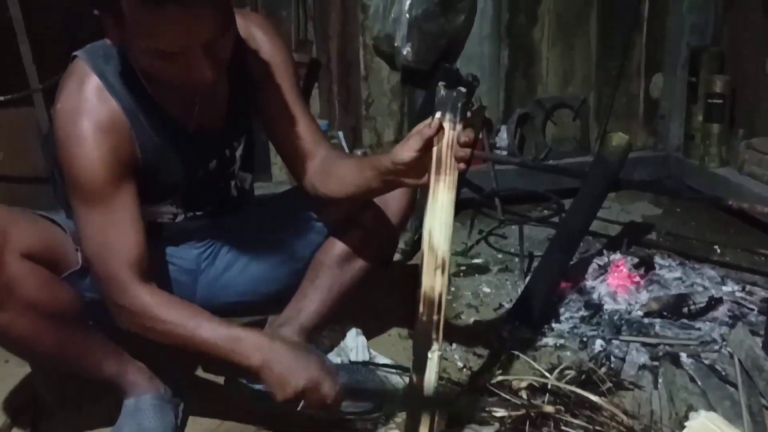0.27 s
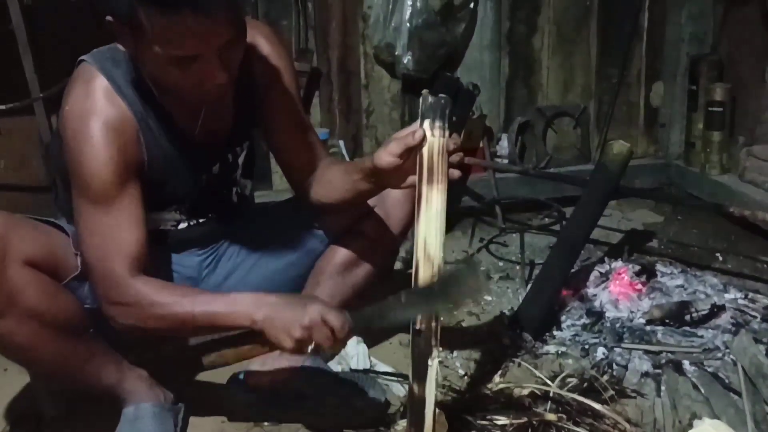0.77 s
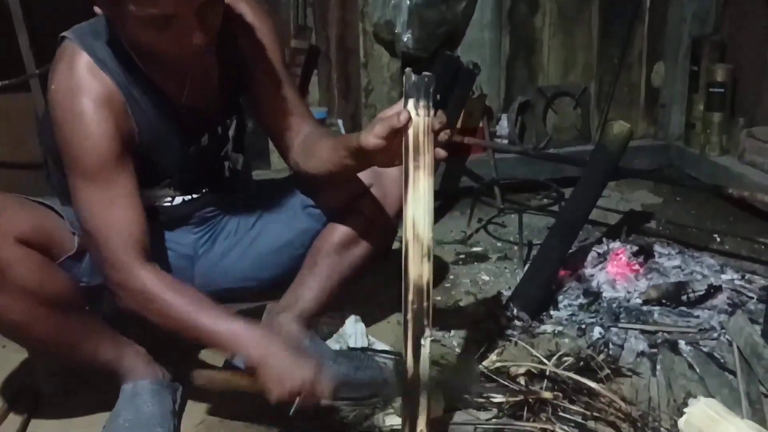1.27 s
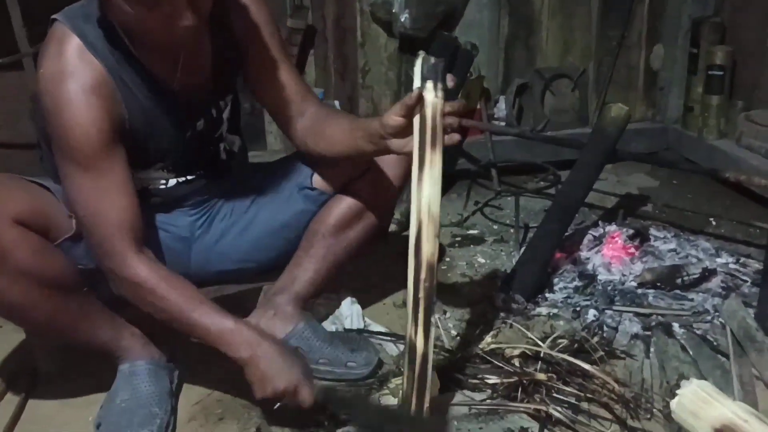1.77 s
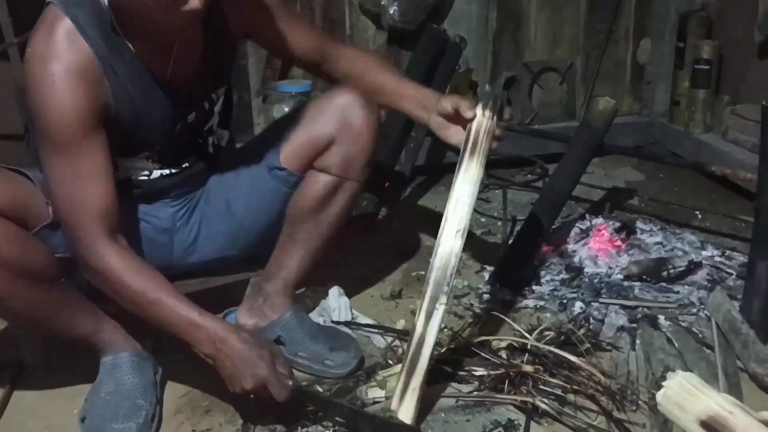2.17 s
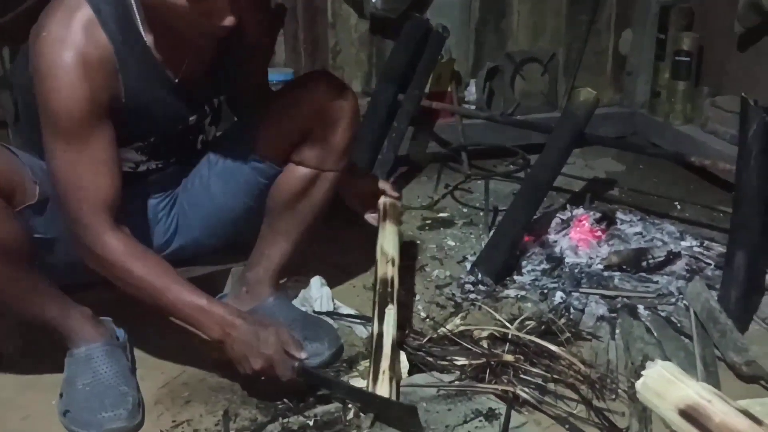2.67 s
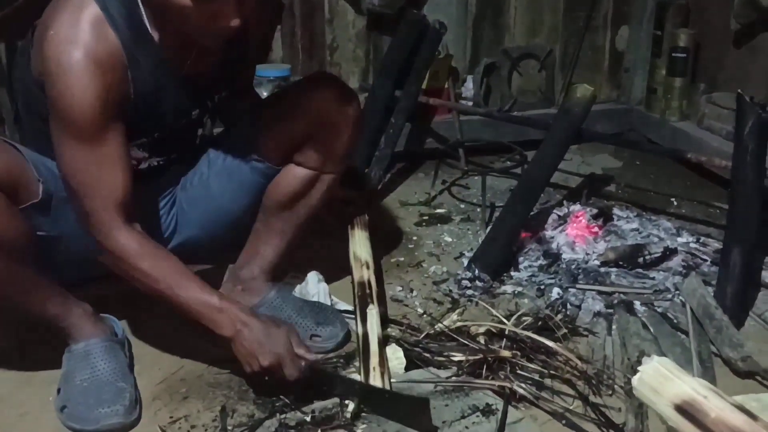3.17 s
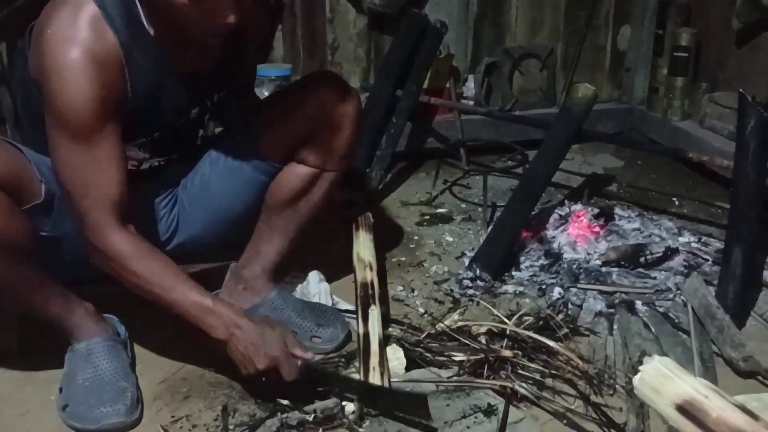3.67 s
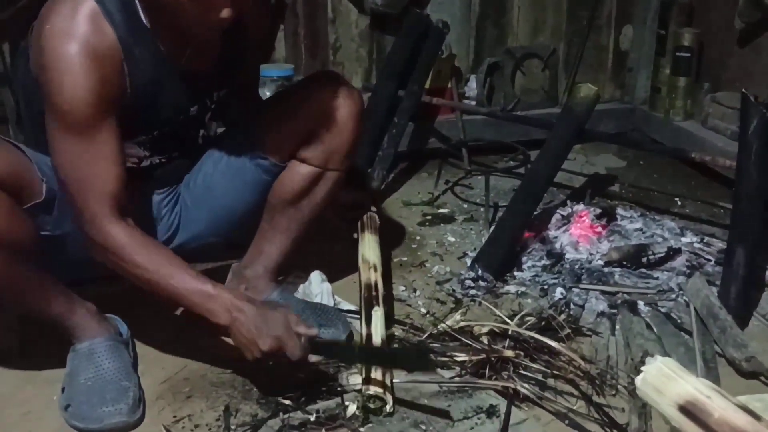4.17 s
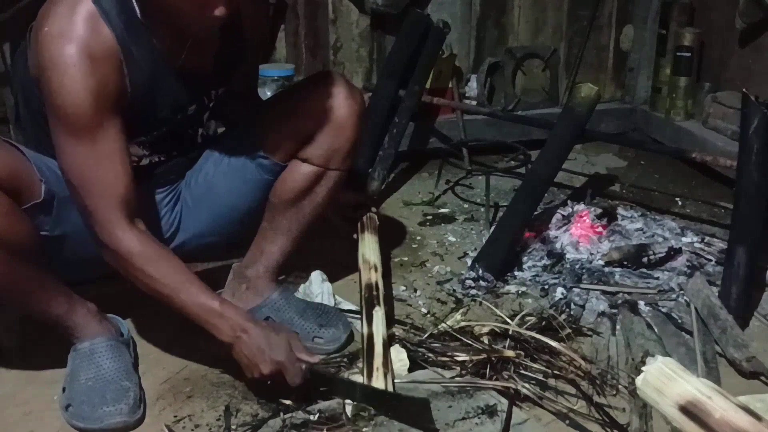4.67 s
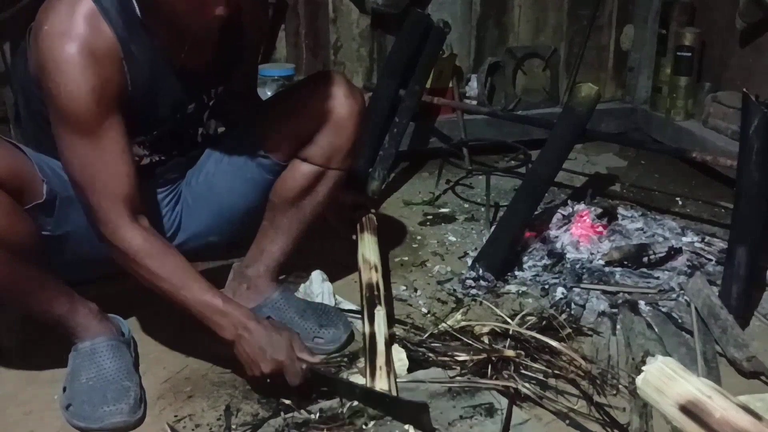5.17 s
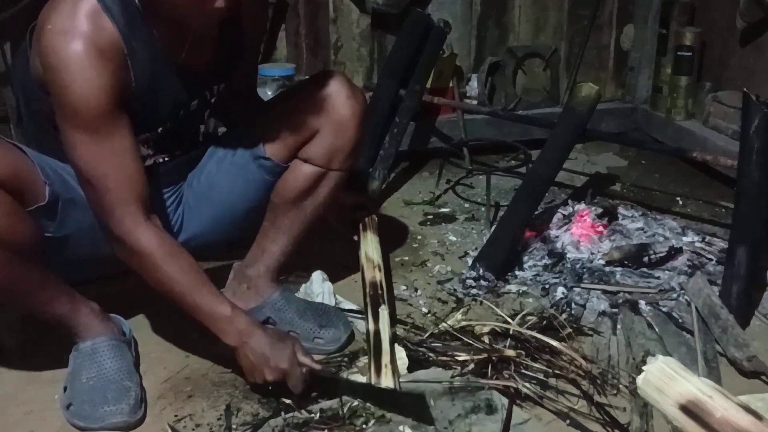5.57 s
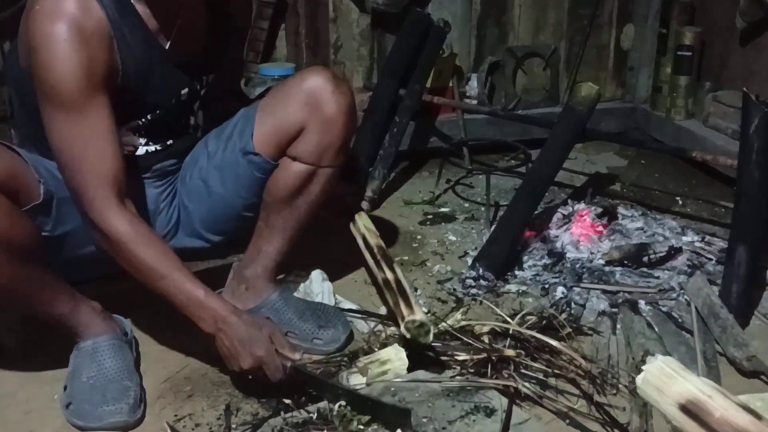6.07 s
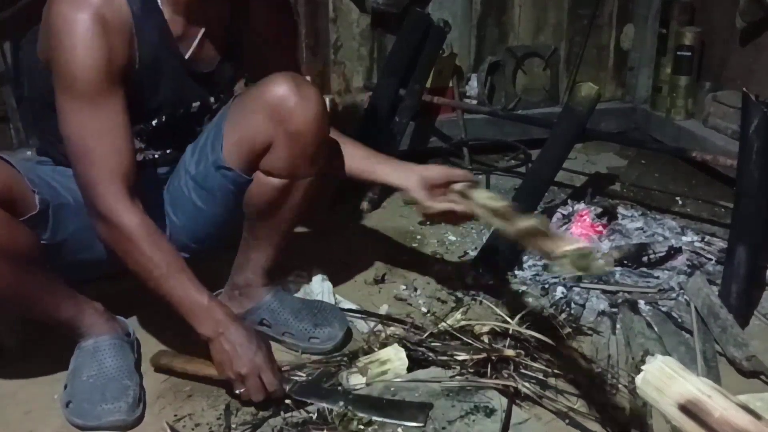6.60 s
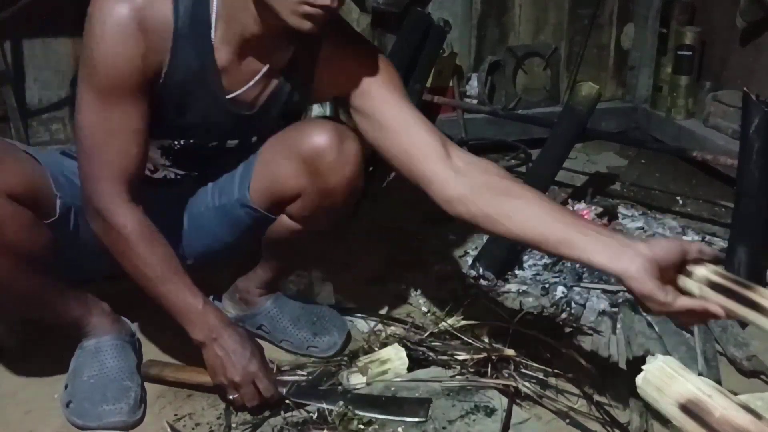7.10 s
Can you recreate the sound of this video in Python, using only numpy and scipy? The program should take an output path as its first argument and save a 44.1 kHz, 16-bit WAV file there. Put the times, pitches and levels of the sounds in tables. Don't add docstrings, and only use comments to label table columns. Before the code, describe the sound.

A close, slightly overloaded microphone in an open shed at night, with very faint insects and air. From 0 s a machete edge rasps over bamboo; at 0.23 s a very loud, hollow, rattling knock rings and its tail is cut short. Scrapes follow, strongest at 0.75 s with squeaky tearing fibre and a bright steel zing, then short strokes near 1.1 and 1.4 s. A lighter knock lands at 1.5 s, a rasp and duller knock just before 2 s. The tube is set down with a soft thump at 2.45 s, with light dirt scuffing. Crisp, crunching chops fall at 3.15, 3.6, 4.1, 4.6 and 5.15 s, with splitting fibres, leafy fizz and small bounces. A hard clacking knock at 5.67 s, blade clatter on stone around 6 s, hollow woody bumps at 6.25 and 6.56 s, a tick at 6.66 s, then faint rustling to 7.3 s.

```python
import sys
import numpy as np
from scipy import signal
from scipy.io import wavfile
from scipy.ndimage import uniform_filter1d

SR = 44100
rng = np.random.default_rng(int(sys.argv[2]) if len(sys.argv) > 2 else 0)


def invert_db(x):
    u = np.asarray(x, float) / 20
    return 10 ** u


def unload_audio(sound):
    columns = np.transpose(np.atleast_2d(sound))
    steps = np.round(np.clip(columns, -1, 1) * 32767)
    wavfile.write(sys.argv[1], SR, steps.astype(np.int16))


N = 323684

# pitch_hz, level_db per Hz
FIBRE_SPECTRUM = [(59, -41.5), (100, -5), (194, -12), (615, -15), (670, -15), (1120, -14), (1270, -16),
                  (2920, -1), (3700, -20.5), (4680, -23), (8510, -12), (10300, -21.5), (13600, -17.5),
                  (15500, -25), (16500, -72)]
# pitch_hz, level_db per Hz
HELD_WALL = [(120, -61), (200, -22.5), (473, 0), (654, -7.5), (849, -1), (955, -18), (1180, -16),
             (2540, -8), (4500, -34), (5850, -80), (9900, -120)]


def evened(x):
    return x / np.sqrt(np.mean(x ** 2) + 1e-20)


def peaked(x):
    return x / abs(x).max()


def read(points, hz):
    f, value = np.transpose(points)
    return np.interp(np.log(hz + 1), np.log(f + 1), value)


def add(mix, start_s, sound):
    part = mix[round(start_s * SR):][:len(sound)]
    part += sound[:len(part)]


def highpass(x, order, hz):
    return signal.sosfilt(signal.butter(order, hz, "high", fs=SR, output="sos"), x)


def colour(points, lo_hz=1, hi_hz=30000):
    hz = abs(np.fft.fftfreq(4096, 1 / SR)) + 1
    edges = (1 + (lo_hz / hz) ** 8) * (1 + (hz / hi_hz) ** 8)
    log_gain = np.log(np.maximum(invert_db(read(points, hz)) / np.sqrt(edges), 1e-5))
    taps = np.fft.ifft(np.exp(np.conj(signal.hilbert(log_gain)))).real[:2048]
    return taps / np.linalg.norm(taps)


def grit(share, spread_db, size=N):
    chance, big, sign = rng.random((size, 3)).T
    heights = invert_db(-spread_db * np.log(big * .995 + .005))
    return evened((chance < share) * heights * (sign - .5))


def shed(x, wet_db):
    decays = [(100, 0.5), (300, 0.22), (700, 0.31), (1800, .26), (3000, 0.25), (4500, 0.17), (13000, 0.16)]  # pitch_hz, t60_s
    taps = np.zeros(len(x))
    at = np.arange(150, len(x) - 20, 20)
    taps[at + rng.integers(0, 20, len(at))] = rng.choice([-1., 1.], len(at))
    hz, t, z = signal.stft(taps, SR, nperseg=256)
    z = z * invert_db(-60 * t / read(decays, hz)[:, None])
    tail = signal.istft(z, SR, nperseg=256)[1][:len(x)]
    return x + invert_db(wet_db) * signal.fftconvolve(x, tail / np.linalg.norm(tail))[:len(x)]


def night():
    night_spectrum = [(25, -36), (60, -3.5), (125, 3.5), (300, -5.5), (800, -11), (1600, -11), (2200, -7.5),
                      (2620, 1.5), (3100, -15), (4200, -31), (6300, -24), (7500, -6.5), (9000, -32),
                      (16500, -33)]
    night_levels = [(0, -53.5), (0.852, -68), (2.2, -61.5), (2.699, -66), (3.1, -69.5), (3.449, -72),
                    (3.95, -68), (4.401, -61), (4.95, -66.5), (5.4, -62), (5.65, -71), (6.199, -62),
                    (6.8, -64), (7.34, -68.5)]
    frames, hz = N // 256 + 5, np.fft.rfftfreq(1024, 1 / SR)
    a, b, patches = rng.standard_normal((frames, 513, 3)).T
    patches = uniform_filter1d(uniform_filter1d(patches, 12, axis=0), 8, axis=1)
    gains = invert_db(read(night_spectrum, hz)[:, None] + 2.0 * evened(patches))
    air = signal.istft((a + 1j * b) * gains, nperseg=1024, noverlap=768)[1][:N]
    s, db = np.transpose(night_levels)
    return evened(air) * invert_db(np.interp(np.arange(N) / SR, s, db))


def pressure(peak_s, db, press_s, release_s):
    t = np.arange(0, N, 32) / SR - peak_s
    away = np.where(t < 0, -t / press_s, t / release_s)
    return invert_db(db - 23 * away ** 1.3)


def smooth(gains):
    return np.interp(np.arange(N), np.arange(0, N, 32), sum(gains))


def hiss_gain(rows):
    return smooth(invert_db(hiss_db) * pressure(s, db, press_s, .8 * release_s)
                  for s, db, press_s, release_s, hiss_db in rows)


def blade(slips):
    steel_modes = [(4080, 60, -6), (4780, 40, -4), (5630, 40, -4), (5960, 45, -6), (7070, 45, -2),
                   (8490, 60, -4), (9740, 50, 1), (11850, 50, 0), (12550, 80, -5)]
    grip_db, grip_s = 4.0, .07
    out, t = np.zeros(N), np.arange(N) / SR
    knots = np.arange(0, N / SR + grip_s, grip_s)
    for hz, width_hz, db in steel_modes:
        r = np.exp(-np.pi * width_hz / SR)
        grip = np.interp(t, knots, invert_db(db + grip_db * rng.standard_normal(len(knots))))
        mode = signal.lfilter([1], [1, -2 * r * np.cos(2 * np.pi * hz / SR), r * r], slips)
        out += grip * evened(mode)
    return evened(out)


def shaving():
    # peak_s, rasp_db, press_s, release_s, hiss_db against the rasp
    edge_strokes = [(.08, -45.5, 0.16, .15, -1.5), (0.17, -42, 0.013, 0.079, -7),
                    (.222, -36, 0.041, 0.013, -7), (0.473, -35, 0.06, 0.11, -6.5),
                    (0.586, -41, 0.0051, 0.072, -0.5), (.627, -47.5, 0.039, 0.016, 1),
                    (.66, -51.5, 0.043, 0.051, -2), (0.694, -44, 0.028, .08, 7.5),
                    (0.723, -31, 0.024, 0.047, 3.5), (0.749, -24, 0.029, .055, -4),
                    (.98, -62, 0.09, 0.122, 7), (1.065, -46.5, 0.035, 0.044, 1),
                    (1.083, -28, 0.015, 0.076, -3), (1.27, -57.5, 0.056, 0.13, 1),
                    (1.404, -45.5, .012, .05, -3.5), (1.426, -29.5, 0.013, 0.083, -0.5),
                    (1.47, -36, 0.069, .02, 0.5), (1.763, -53.5, 0.0037, .12, -9.5),
                    (1.867, -43, 0.035, 0.13, 1.5), (1.941, -34.5, 0.098, 0.016, 1)]
    stone_clatters = [
        (5.931, -42.5, 0.019, 0.047, -14),
        (5.995, -42, 0.077, 0.06, -13),
        (6.039, -47.5, 0.063, 0.07, -8.5),
        (6.25, -57, .012, 0.12, -12.5),
        (6.362, -62.5, 0.024, 0.029, -25),
    ]
    dirt_scuffs = [(2.36, -42, 0.1, 0.19, -17), (2.5, -45, .25, 0.088, -9.5), (2.76, -67, 0.035, 0.21, -4),
                   (2.99, -63.5, 0.14, 0.32, -22.5), (3.07, -64, .08, 0.072, -23),
                   (5.9, -78, 0.067, 0.095, -33), (7.1, -62.5, 0.18, 0.18, -12.5),
                   (7.25, -66.5, 0.18, .4, -12)]
    # peak_s, level_db, press_s, release_s
    blade_drags = [(.385, -53.5, 0.096, 0.047), (1.559, -47.5, .006, 0.05), (1.622, -42.5, 0.055, 0.045),
                   (2.11, -65, .17, .03), (5.7, -41.5, .01, .04), (5.82, -62, 0.27, 0.31),
                   (6.63, -61.5, 0.11, 0.093)]
    leaf_rustles = [(3.152, -43, .004, .13), (3.62, -48, .004, .15), (4.09, -42, .004, .14),
                    (4.61, -44, .005, .12), (5.14, -46, .005, .12), (1.6, -52, .05, .07),
                    (5.7, -51.5, .02, .14), (7.19, -64, 0.24, 0.27)]
    ground_shakes = [(.3, -53), (3.26, -54), (3.77, -56), (4.21, -51), (4.78, -54), (5.29, -56),
                     (5.85, -60), (6.02, -62)]

    edge_rasp = smooth(pressure(*row[:-1]) for row in edge_strokes)
    rasp = smooth(pressure(*row[:-1]) for row in edge_strokes + stone_clatters + dirt_scuffs)
    edge, stone, dirt = [hiss_gain(rows) for rows in (edge_strokes, stone_clatters, dirt_scuffs)]
    drag = smooth(pressure(*row) for row in blade_drags)
    rustle = smooth(pressure(*row) for row in leaf_rustles)
    clumps = invert_db(2.2 * evened(uniform_filter1d(rng.standard_normal(N), 300)))
    slips = grit(.4, 1.8)

    def band(lo, hi):
        source = np.roll(slips, 7 * hi) * np.roll(clumps, lo)
        return evened(signal.oaconvolve(source, colour(FIBRE_SPECTRUM, lo, hi))[:N])

    bright = band(3800, 19000)
    hiss = (edge + .15 * drag + 0.86 * (stone + dirt)) * bright
    hiss += .9 * drag * band(3800, 9500) + (.6 * dirt + rustle) * band(5900, 6300)

    steel = blade(grit(.02, 3.5) * clumps)
    damped = signal.sosfilt(signal.butter(1, 5500, fs=SR, output="sos"), steel)
    ringing = (invert_db(-11.5) * edge + invert_db(-17) * dirt + 0.076 * drag) * steel
    clatter = invert_db(2) * stone * damped

    body = (invert_db(-29.5) * rasp ** 0.56 + invert_db(7.5) * stone) * band(150, 1900)
    rumble = invert_db(-45) * edge_rasp ** .4 * band(60, 150)
    shake_gain = smooth(pressure(*row, .2, .12) for row in ground_shakes)
    deep = signal.butter(3, [52, 140], "band", fs=SR, output="sos")
    shake = shake_gain * evened(signal.sosfilt(deep, slips))
    return shake + rumble + rasp * band(1100, 5400) + body + hiss + ringing + clatter


def swelling_tones(rows, share=1):
    out = np.zeros(N)
    for peak_s, db, hz, length_s in rows:
        length_s = length_s * share
        t = np.arange(-.5 * length_s, length_s, 1 / SR)
        envelope = np.cos(np.pi * np.where(t < 0, t, t / 2) / length_s) ** 2
        add(out, peak_s + t[0], invert_db(db) * envelope * np.sin(2 * np.pi * hz * t))
    return out


def singing_steel():
    steel_songs = [(.05, -49, 9740, .11), (.06, -51, 11850, .06), (0.065, -50, 4060, 0.04),
                   (0.178, -45, 9740, .045), (0.38, -57, 9700, 0.035), (0.38, -64, 11800, 0.034),
                   (0.483, -49, 4780, .015), (0.487, -50, 5960, 0.033), (.5, -49, 9740, .03),
                   (0.528, -49, 9740, 0.034), (0.53, -51, 11800, 0.06), (.72, -36, 12500, .03),
                   (0.591, -41, 9740, .015), (.623, -55, 4080, 0.034), (0.61, -52, 6200, .02),
                   (.695, -29, 8490, 0.022), (0.716, -25, 9740, .025), (0.724, -25, 11800, .03),
                   (0.73, -31, 5600, .03), (0.743, -28.5, 9740, 0.033), (.737, -32, 11850, .015),
                   (0.799, -57, 11850, 0.046), (.8, -54.5, 9700, 0.06), (1.069, -38.5, 9770, 0.035),
                   (1.284, -60, 9740, 0.062), (1.303, -55, 8490, 0.044), (1.37, -57, 9800, 0.076),
                   (1.442, -41, 4080, .03), (1.622, -57, 12000, 0.065), (1.62, -55, 8500, 0.043),
                   (1.777, -63, 9780, .04), (1.825, -62, 9740, .05), (1.873, -50, 4100, 0.034),
                   (1.9, -39, 8570, 0.044), (5.93, -50, 11850, .03), (5.955, -54, 9720, .13),
                   (5.93, -52, 5600, .02), (5.99, -54, 4760, .12), (6.012, -53, 6550, .03),
                   (5.995, -54, 8560, .03), (6.03, -55, 6200, .04), (6.01, -57, 11850, .12),
                   (6.015, -49, 7070, .05), (6.03, -52, 8490, .03), (5.93, -52, 10800, .015)]
    flutter = uniform_filter1d(uniform_filter1d(rng.standard_normal(N), size=150), size=150)
    return swelling_tones(steel_songs, share=.6) * invert_db(-2 + 4 * evened(flutter))


def wall_pulses(rows):
    out, t = np.zeros(N), np.arange(-130, 600) / SR
    rise_s, fall_s = 0.00051, 0.0015
    shape = np.where(t < 0, np.exp(-(t / rise_s) ** 2), np.exp(-abs(t) / fall_s))
    for peak_s, db, hz in rows:
        add(out, peak_s + t[0], invert_db(db) * shape * np.cos(2 * np.pi * hz * t))
    return out


def parting_fibres():
    # peak_s, level_db, pitch_hz
    shaved_bundles = [(0.069, -35, 1800), (.167, -34, 3100), (0.451, -32, 2800), (.459, -33, 2700),
                      (0.47, -34, 2500), (.484, -32, 2200), (.49, -30, 2190), (.506, -35, 2900),
                      (.524, -36, 2900), (.586, -32, 2900), (0.731, -13, 2700), (0.7418, -18, 2600),
                      (0.7464, -11, 2720), (0.751, -14, 2730), (.756, -20, 2650), (0.766, -26, 2800),
                      (1.082, -17, 2940), (1.0853, -34, 2880), (1.1023, -23, 2690), (1.4227, -26, 2770),
                      (1.43, -23, 2800), (1.4395, -24, 2700), (1.459, -24.5, 2800), (1.8622, -35, 2900),
                      (1.9227, -29, 2800), (1.9415, -23.5, 2890)]
    chopped_bundles = [(3.1486, -3, 3050), (3.1561, -10.5, 3000), (3.1618, -13.5, 2700),
                       (3.1652, -12.5, 2750), (3.1825, -20.5, 2900), (3.1937, -18, 2700),
                       (3.6163, -14, 2500), (3.6252, -17, 2600), (3.632, -15, 2800), (3.635, -18, 2900),
                       (3.6539, -12.5, 2800), (3.657, -15, 2800), (4.0872, -8.5, 2500),
                       (4.0885, -13.5, 3500), (4.0966, -17, 2400), (4.1142, -20, 2800), (4.1267, -22, 2900),
                       (4.6034, -9.5, 3000), (4.6076, -4.5, 2800), (4.6162, -13, 2600), (4.6215, -14, 2700),
                       (4.6303, -19.5, 2400), (4.654, -11, 1900), (5.134, -24, 2600), (5.1361, -9, 2700),
                       (5.1382, -10, 1800), (5.1403, -6.5, 2700), (5.1435, -18, 2900), (5.153, -22, 2800)]
    return wall_pulses(shaved_bundles + chopped_bundles)


def ticks():
    small_snaps = [(0.163, -35.5), (1.401, -33), (1.421, -18.5), (1.5564, -31), (2.926, -43),
                   (2.9364, -60.5), (2.9515, -58), (2.986, -41.5), (3.074, -55), (3.1445, -27),
                   (3.314, -61), (4.607, -18), (5.1335, -30), (5.6725, -18), (5.929, -37), (5.9887, -47),
                   (6.361, -52)]
    out, snap = np.zeros(N), colour(FIBRE_SPECTRUM, 1100, 6500)
    for s, db in small_snaps + [(.221, -24)]:
        burst = np.convolve(rng.standard_normal(90) * np.exp(-np.arange(90) / 19.0), snap)
        add(out, s, invert_db(db) * peaked(burst))
    return out


def ring(modes, t, spread, longest_s=2):
    hz, db, t60 = np.array(modes).T[:, :, None]
    detune, weight = rng.standard_normal((2, len(modes), 1))
    decay = invert_db(db + 1.0 * weight - 60 * t / np.minimum(t60, longest_s))
    return peaked((decay * np.sin(2 * np.pi * hz * (1 + spread * detune) * t)).sum(0))


def blow(row, wall, wall_t60, crunch_t60, fizz_t60, modes_db, crunch_db, snap_db, fizz_db, wet_db):
    tube_modes = [(464, -7, 0.54), (526, -7, 0.23), (693, -4.5, .1), (845, -8, .15), (986, -0.5, 0.076),
                  (1192, -8.5, 0.23), (1280, -7.5, .16), (1332, 1.5, 0.076), (1605, -9, 0.07),
                  (1800, -10.5, 0.12), (2036, -5, 0.12), (2015, -7.5, 0.4), (1944, 2.5, 0.14),
                  (2233, -6.5, 0.046), (2685, -9.5, 0.097), (2743, -5.5, 0.29), (3050, -13.5, 0.05)]
    ground_modes = [(136, 1.5, 0.12), (170, 0, 0.07), (205, -2, 0.08), (242, 2, 0.076), (312, -3.5, 0.3)]  # pitch_hz, level_db, t60_s
    start_s, db, low_db, top_db, thud_db = row
    t = np.arange(round(.36 * SR)) / SR
    contact = grit(.05, 0.98, size=len(t)) * np.exp(-t / .002)
    contact[0] = abs(contact).max() + 1

    def through(source, response):
        return peaked(signal.fftconvolve(source, response)[:len(t)])

    def struck(modes):
        return through(contact, ring(modes, t[:9000], .015, .2))

    def torn(spectrum, t60, lo, hi, share=.12, spread_db=3.2):
        tearing = grit(share, spread_db, size=len(t)) * invert_db(-60 * t / t60)
        return through(tearing, colour(spectrum, lo, hi))

    def snap(lo, hi):
        return invert_db(snap_db) * through(contact, colour(wall, lo, hi))

    low = invert_db(modes_db) * struck([m for m in tube_modes if m[0] < 1450])
    low += torn(wall, wall_t60, 300, 1450) + .6 * snap(500, 1450)
    high = invert_db(modes_db) * struck([m for m in tube_modes if m[0] > 1450])
    high += torn(wall, wall_t60, 1450, 3500) + snap(1450, 4000)
    crunch = invert_db(crunch_db) * torn(FIBRE_SPECTRUM, crunch_t60, 1450, 3500)
    crack = torn(FIBRE_SPECTRUM, .03, 2600, 13000, .3, 2)
    fizz = invert_db(fizz_db) * torn(FIBRE_SPECTRUM, fizz_t60, 4100, 11000, .5, 1.2)
    thud = 1.3 * struck(ground_modes) + torn(FIBRE_SPECTRUM, 0.055, 150, 380)
    body = invert_db(low_db) * low + high + crunch + invert_db(thud_db) * thud
    return start_s + .0018, invert_db(db) * (shed(body, wet_db) + invert_db(top_db) * (fizz + crack))


def blows(rows, wall, **settings):
    out = np.zeros(N)
    for row in rows:
        add(out, *blow(row, wall, **settings))
    return out


def knocks():
    # start_s, blow_db, low_db, crack_db, thud_db
    hard_knocks = [
        (0.23, 4.5, -4, -13.5, -54.5),
        (1.494, -4, 2, -21.5, -47.5),
        (1.964, -7.5, 2.5, -30.5, -35),
        (5.674, 2.5, -1, -7, -31.5),
    ]
    rattling_wall = [(120, -53), (200, -26), (717, -4), (860, -0.5), (1010, -11), (1130, -1), (1530, -4),
                     (1720, -7), (2090, -7.5), (2710, -7.5), (4500, -45), (5850, -66.5), (9900, -120)]
    return blows(hard_knocks, rattling_wall, wall_t60=0.1, crunch_t60=0.034, fizz_t60=0.11,
                 modes_db=-8.5, crunch_db=-10.5, snap_db=9.0, fizz_db=-17.5, wet_db=-8.5)


def slaps():
    wall_slaps = [(.2335, -2, 1900), (.2365, -2, 2700), (.2385, -3, 2000), (.2425, -6, 550),
                  (.2535, -6, 1250), (1.4968, -14, 4700), (1.4965, -3, 1800), (1.501, -3, 2200),
                  (1.507, -8, 1100), (1.5165, -8, 1000), (5.682, -4, 1700), (5.6935, -6, 1450),
                  (5.7008, -1, 900), (5.709, -7, 1150), (1.4988, -3, 1900), (3.1472, -22, 3800),
                  (4.0868, -19, 6000), (4.6028, -16, 3700), (2.4555, -28, 600), (6.6615, -36, 2700),
                  (6.5608, -20, 900)]
    return wall_pulses(wall_slaps)


def swelling_tails():
    tail_swells = [(.283, -20, 851, 0.025), (.241, -10, 2130, .016), (.26, -20, 2900, .04),
                   (.24, -16, 2450, .02), (1.525, -18, 1255, .04), (1.55, -19, 850, .02),
                   (1.503, -14, 2000, .02), (1.968, -10, 1950, 0.006), (1.987, -22, 894, 0.023),
                   (2.005, -24, 2140, 0.027), (2.023, -22, 845, 0.025), (5.678, -5, 2710, .006),
                   (5.701, -13, 880, .015), (5.73, -22, 854.4, .03), (5.725, -22, 1457, 0.034),
                   (5.76, -28, 1520, 0.042), (1.08, -44, 1160, .05), (6.584, -25, 851, .02),
                   (6.614, -30, 830, .02), (3.685, -30, 208, .06), (3.67, -28, 467, .04),
                   (3.68, -30, 694, .04), (3.68, -30, 330, .04), (4.104, -19, 172, .016),
                   (4.145, -27, 212, .04), (3.161, -36, 185, .02), (4.619, -21, 165, .016),
                   (4.665, -26, 420, .04), (5.145, -24, 400, .03)]
    return swelling_tones(tail_swells)


def humming_blade():
    # start_s, level_db, tilt_db per octave
    blade_hums = [
        (.235, -43.5, -0.5),
        (1.5, -56.5, 4),
        (1.97, -59, -7),
        (5.68, -51, 19.5),
    ]
    bending_modes = [(812, 0, 1.5), (904, -4, 1.2), (977, -5, 1.6), (1168, -10, 1.2), (1388, -13, 1.7)]  # pitch_hz, level_db, t60_s
    out, t = np.zeros(N), np.arange(SR) / SR
    for s, level_db, tilt_db in blade_hums:
        for hz, db, t60 in bending_modes:
            tilted_db = level_db + db + tilt_db * np.log2(hz / bending_modes[0][0])
            waver_db = 3 * np.interp(t, np.arange(31) / 30, rng.standard_normal(31))
            add(out, s, invert_db(tilted_db - 60 * t / t60 + waver_db) * np.sin(2 * np.pi * hz * t))
    return out


def bumps():
    # start_s, level_db, pitch_hz
    soft_bumps = [
        (1.075, -36, 500),
        (1.402, -40, 480),
        (2.4567, -17, 450),
        (4.654, -13.5, 1180),
        (3.657, -22, 550),
    ]
    out, t = np.zeros(N), np.arange(4000) / SR
    for s, db, hz in soft_bumps:
        tone = np.sin(2 * np.pi * hz * t * np.exp(-t / 0.012)) * np.exp(-t / 0.00053) * 3.25
        add(out, s, invert_db(db) * shed(tone, -17.0))
    return out


def lone_rings():
    single_rings = [(2.4598, -25, 115, .045), (1.967, -18, 2130, 0.16), (1.967, -18, 468, 0.18),
                    (6.009, -44, 473.6, 0.22), (6.241, -39, 479, .13), (6.252, -42.5, 526, 0.078),
                    (6.241, -62, 4780, 0.1), (6.241, -65, 5650, 0.094), (6.566, -21.5, 479, 0.11),
                    (6.562, -26, 845, 0.1), (6.563, -65, 4780, .08), (6.563, -61, 5700, 0.094)]
    out, t = np.zeros(N), np.arange(SR) / SR
    for s, db, hz, t60 in single_rings:
        add(out, s, invert_db(db - 60 * t / t60) * np.sin(2 * np.pi * hz * t))
    return out


def chops():
    chop_blows = [
        (3.1465, -19, -10, 2, -29),
        (3.156, -16.5, -14, -8, -18),
        (3.614, -13, -11, 2, -26.5),
        (3.63, -32, -0.5, 12, -13),
        (4.085, -13.5, -4, 0, -16),
        (4.095, -34, 0, -7, 2),
        (4.601, -10, -4.5, -6.5, -18),
        (4.605, -22.5, -11.5, 10.5, -12.5),
        (4.615, -23, -7.5, -8, -5),
        (5.1355, -12.5, 1.5, 0.5, -15),
    ]
    split_wall = [(120, -38.5), (200, -16.5), (364, -14.5), (1210, -13), (1810, -12), (2470, -3.5),
                  (2820, -3), (3120, -7.5), (3800, -15.5), (4500, -12.5), (5850, -59), (9900, -120)]
    return blows(chop_blows, split_wall, wall_t60=0.18, crunch_t60=0.21, fizz_t60=0.28,
                 modes_db=-11.5, crunch_db=-3.5, snap_db=-2.0, fizz_db=-10.5, wet_db=-9.0)


def rebounds():
    stone_bounces = [(3.651, -29, 3.5, -9, 1.5), (3.656, -21.5, -1, -21, -9),
                     (3.71, -34.5, -12, -19.5, -16), (4.099, -18.5, -18, -23, -9),
                     (4.62, -28.5, -3, -7, -13), (4.653, -24.5, 11.5, -23.5, 1),
                     (5.148, -16.5, 1.5, -23, -5)]
    return blows(stone_bounces, HELD_WALL, wall_t60=0.15, crunch_t60=0.014, fizz_t60=0.0497,
                 modes_db=-13.5, crunch_db=5.0, snap_db=3.6, fizz_db=-9.5, wet_db=-7.0)


def laying():
    laying_blows = [(6.239, -67.5, 7.5, 3.5, 7.5), (6.239, -61, 14.5, -6.5, 10), (6.558, -33, 13, -15, -26),
                    (6.584, -46, 6, -18, -10), (6.609, -63, 3, -11, -11), (6.661, -33.5, -23, -20, -6)]
    return blows(laying_blows, HELD_WALL, wall_t60=0.072, crunch_t60=0.23, fizz_t60=0.1,
                 modes_db=-3.5, crunch_db=-13.0, snap_db=0.44, fizz_db=-8.0, wet_db=-3.5)


def suppressor():
    gate_closings = [(0.411, 0.451, -35), (1.676, 1.759, -34), (2.128, 2.247, -14.5), (3.785, 3.855, -3),
                     (4.251, 4.297, -6.5), (4.786, 4.84, -8), (5.312, 5.358, -2.5), (5.856, 5.901, 0),
                     (6.665, 6.718, -11.5)]
    cut_db, dim_db = np.zeros((2, N))
    for start_s, end_s, db in gate_closings:
        cut_db[round(start_s * SR):round((end_s + .15) * SR)] = db
        dim_db[round(start_s * SR):round(end_s * SR)] = db
    return cut_db, dim_db


def scene():
    cut_db, dim_db = suppressor()
    hits = highpass(knocks() + chops() + rebounds() + laying(), 3, 110)
    hits = hits * invert_db(uniform_filter1d(cut_db, 600))
    small = highpass(ticks() + humming_blade() + bumps() + lone_rings(), 2, 70)
    rest = (small + night()) * invert_db(0.31 * uniform_filter1d(dim_db, 400))
    shaved = shaving() * invert_db(0.57 * uniform_filter1d(dim_db, 200))
    tones = singing_steel() + parting_fibres() + slaps() + swelling_tails()
    return (shaved + hits + rest + tones)[None]


def roll_off(x):
    return signal.sosfilt(signal.butter(12, 16770, fs=SR, output="sos"), x)


def record(dry):
    knee, headroom = .6, .36
    over = np.maximum(abs(dry) - knee, 0)
    held = np.sign(dry) * (np.minimum(abs(dry), knee) + headroom * np.tanh(over / headroom))
    held = signal.sosfilt(signal.butter(8, 15800, fs=SR, output="sos"), held) * .87
    return roll_off(held)


dry = scene()
out = record(dry)
unload_audio(out)
```